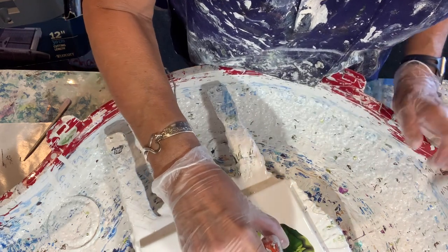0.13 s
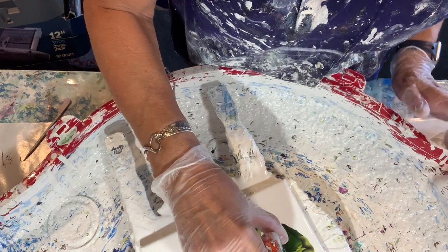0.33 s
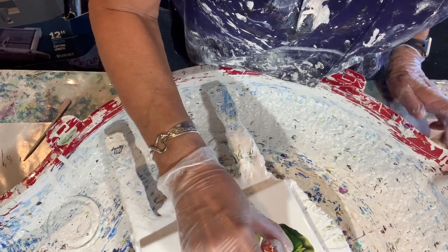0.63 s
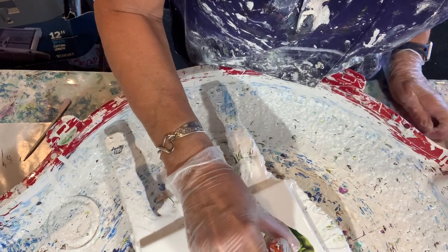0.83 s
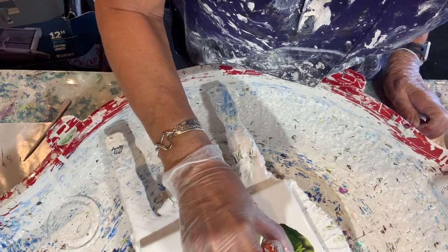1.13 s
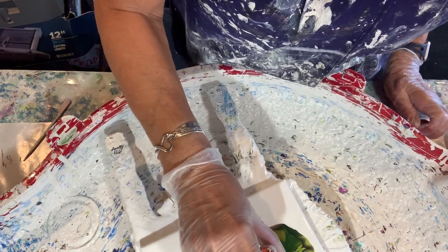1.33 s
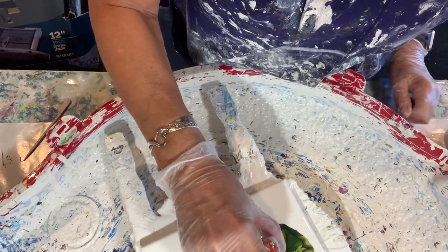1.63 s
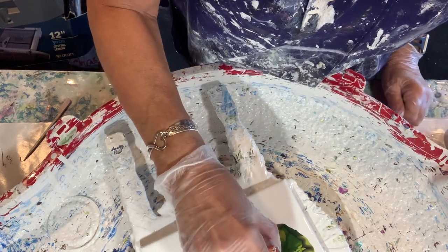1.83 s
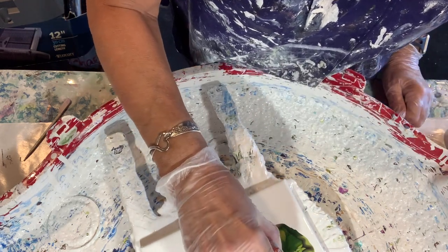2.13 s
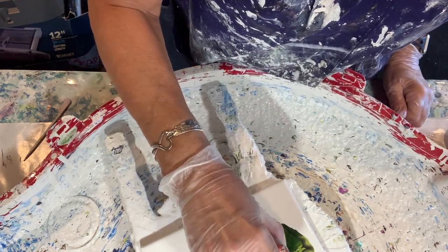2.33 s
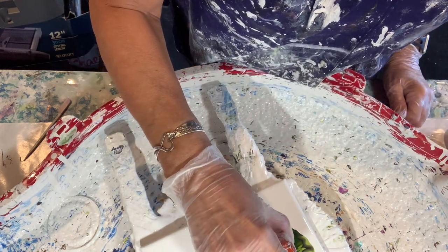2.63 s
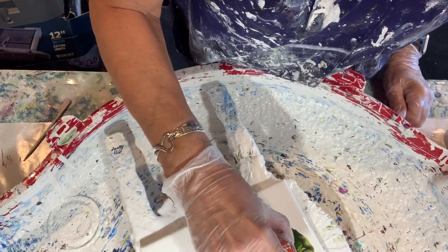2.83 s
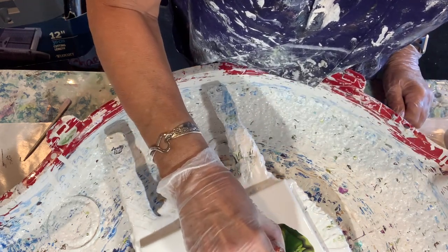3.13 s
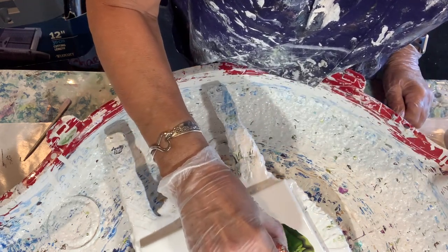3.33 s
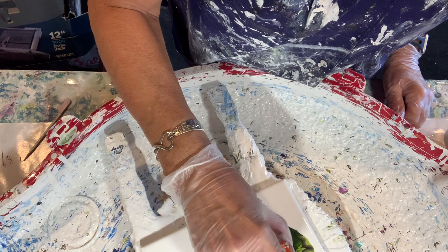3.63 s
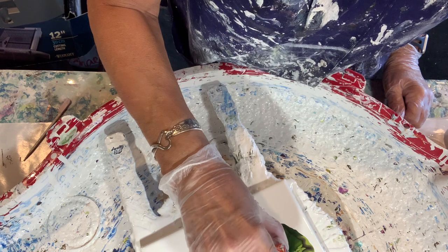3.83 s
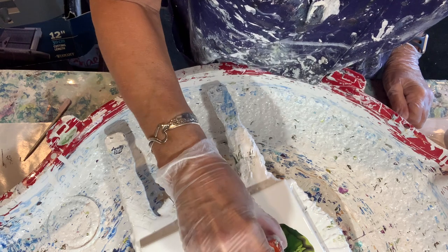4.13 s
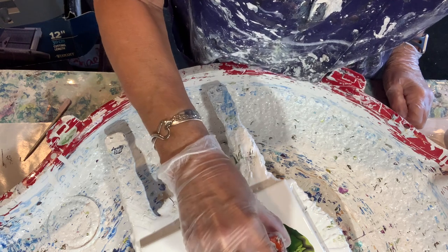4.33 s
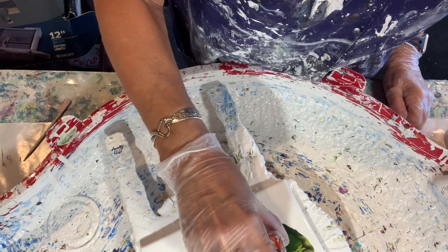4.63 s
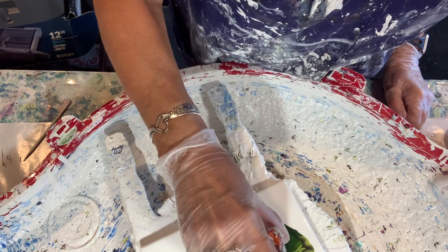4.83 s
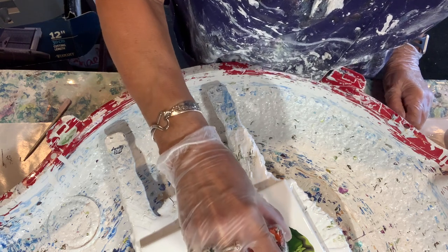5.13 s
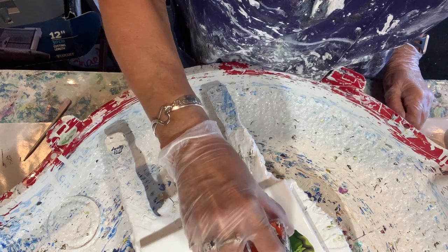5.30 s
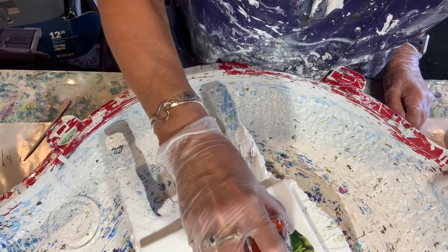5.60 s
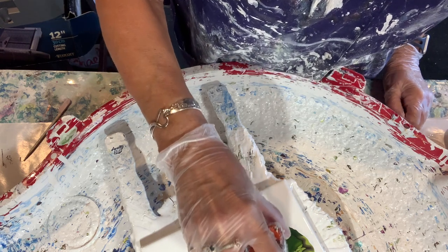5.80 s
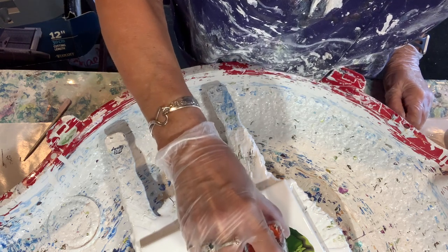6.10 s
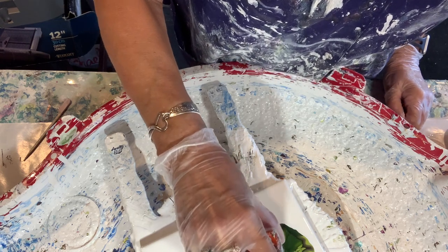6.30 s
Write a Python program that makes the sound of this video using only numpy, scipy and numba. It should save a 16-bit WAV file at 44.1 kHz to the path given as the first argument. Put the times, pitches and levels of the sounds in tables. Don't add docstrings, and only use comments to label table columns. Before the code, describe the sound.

A tiny handheld blower whirs steadily, with a wavering high whine and airy hiss over faint room rumble, and one small sharp metallic click early on.

```python
import sys
import numpy as np
from scipy import signal
from scipy.fft import rfft, irfft
from scipy.io import wavfile
from scipy.ndimage import uniform_filter1d
from numba import njit

SR = 44100
rng = np.random.default_rng(int(sys.argv[2]) if len(sys.argv) > 2 else 0)


def digitize_waveform(pressure):
    field = np.atleast_2d(pressure).T
    bounded = np.clip(field, -1, 1)
    quanta = np.round(bounded * 32767).astype(np.int16)
    wavfile.write(sys.argv[1], SR, quanta)


def rack_gain(trim_db):
    fader = np.asarray(trim_db, float)
    return 10 ** (fader / 20)


N = 284883
HZ = np.arange(N // 2 + 1) * SR / N + 1e-3
STEP = 64

# pitch_hz, level_db_per_hz
ROOM_RUMBLE = [(25, -102), (40, -90), (58, -69), (90, -73.5), (150, -76.5), (185, -99.5), (300, -100)]
# start_s, peak_db
CHARM_CLICKS = [
    (.7275, -37),
    (.772, -35),
    (.881, -36),
    (1.1081, -7.5),
    (1.1115, -17),
    (1.1172, -21),
]
# pitch_hz, level_db, t60_s
CHARM_MODES = [(440, -24, .03), (2180, -14, .04), (3150, -18, .03), (6600, -16, .012), (7400, -9, .012),
               (8900, -6, .008), (10900, -3, .01), (12400, -11, .012), (14000, -8, .008)]
# pitch_hz, level_db_per_hz
JET_HISS = [(170, -84), (300, -86), (600, -89), (800, -82), (1050, -77), (1350, -73), (1600, -81),
            (2000, -85), (2400, -92), (3300, -90), (5100, -92), (6400, -96), (8800, -92.5), (12700, -103),
            (15500, -100)]
# pitch_hz, width_hz, level_db, share of the nozzle swell
CAVITIES = [(1259, 94, -53.5, 0.22), (1383.3, 66, -48, 0.4), (1460, 48, -78, 0.63),
            (1938, 44, -59.5, -0.29), (2088, 210, -58.5, -0.7), (2830, 870, -57.5, 0.25),
            (4230, 200, -67, -1.3)]
# start_s, shaft_turns_per_s, yaw, pitch, roll (spreads about the mean pose)
HAND_MOTION = [(0.0, 152.25, 0.2, 2.3, -1.3), (0.16, 152.32, -0.0, 1.1, 0.0),
               (0.72, 150.43, -1.3, -0.2, -0.1), (1.28, 151.87, 0.2, 0.2, -1.2),
               (1.64, 150.34, -0.6, -0.7, -1.8), (1.76, 150.14, -0.8, 1.3, -2.0),
               (2.16, 150.81, -1.2, 0.5, 2.2), (2.44, 150.92, -1.0, 0.4, 1.5),
               (2.75, 152.98, 0.3, 3.6, -0.1), (2.99, 150.91, -1.1, -0.8, 1.1),
               (3.11, 150.81, -0.8, -1.3, -1.6), (3.67, 150.99, -1.4, -0.5, 2.0),
               (3.79, 150.3, -1.1, -1.1, -0.0), (4.19, 150.52, 0.3, -1.4, -1.1),
               (4.67, 152.15, 1.4, -0.1, -1.0), (5.02, 152.52, 1.8, 1.6, -0.2),
               (5.46, 151.32, 1.1, -1.4, 1.6), (6.46, 152.1, 1.2, 0.2, 0.1)]
# multiple, level_db
WEAK_MULTIPLES = [(1, -63), (5, -74), (12, -66), (14, -67), (15, -75), (16, -69), (17, -75), (20, -63),
                  (22, -67), (27, -65), (30, -67), (31, -66), (34, -64), (45, -63)]
# pitch_hz, level_db
HIGH_MULTIPLES = [(5500, -66), (6500, -67.5), (7300, -67), (7900, -71), (8600, -68), (10000, -70),
                  (11500, -69.5), (12500, -77), (13500, -74), (15500, -74)]
# multiple, level_db, db_per_yaw, db_per_pitch, db_per_roll
BEAMS = [(6, -55.5, -2.1, 2.0, -0.4), (7, -46, -2.3, 0.25, 0.1), (8, -52.0, 1.5, -2.5, 0.1),
         (9, -42, 1, -0.3, 0.5), (10, -46.5, -0.66, -2, 0.9), (11, -56, 5.5, 1.5, 0.9),
         (13, -60, -0.5, -2.0, -1.5), (18, -65.5, 5.5, -1.5, -2.3), (19, -65.5, -1.1, -1.5, 0),
         (21, -64, 3.5, 1.5, -0.5), (23, -67.5, -1.4, -1, -1.7), (24, -69.5, -3.3, 1.2, 2),
         (25, -64, -3.5, 0.9, -2.2), (26, -66.5, -1.5, 0.5, -1.5), (28, -65.5, -1.2, -0.8, 2.5),
         (29, -68, -1, 0.5, 3.5), (32, -67, 4, 0.1, 0.5), (33, -68, 0, -1.5, -3.7),
         (35, -66.5, 1.9, -3.5, -3.3), (36, -68.5, 2, 2.5, 2.8), (38, -76.5, 0, -2.5, 6),
         (39, -72, 5.5, -3.5, -2), (41, -73.5, -3.7, 1, 0.2)]
# start_s (centre), half_length_s, multiple, level_db
CANVAS_GLINTS = [(.72, 0.12, 6, -5), (1.758, 0.14, 6, 2), (1.76, 0.076, 8, -15), (2.0, 0.77, 18, 2),
                 (2.482, 0.083, 8, -3), (2.63, 0.086, 6, 7.5), (.75, 0.17, 25, 0.5), (2.1, 0.093, 7, 4.5),
                 (2.51, 0.043, 29, 9.5), (3.2, 0.22, 41, 5), (3.128, 0.16, 9, -2.5), (3.437, 0.19, 35, 5.5),
                 (3.55, 0.2, 29, 8), (3.926, 0.087, 10, 4), (4.24, 0.25, 38, 10)]
# pitch_hz, left_lead_rad
PORT_LEAD = [(60, 0), (200, .2), (900, -.5), (1700, -.8), (2100, -2.8), (2720, -1.9), (2880, -2.7),
             (3450, -2.0), (3900, .1), (4400, .6), (4900, 3.4), (6200, 5.4), (7400, 6.2), (15300, 18.9),
             (17000, 21.6)]
# pitch_hz, share heard alike (0 to 1)
PORT_LIKENESS = [(60, .99), (250, .7), (550, .6), (880, .96), (1500, .97), (2200, .7), (3000, .8),
                 (4000, .4), (5300, .15), (6200, .6), (7400, .93), (9000, .97), (15000, .97)]
# pitch_hz, left_minus_right_db
PORT_BALANCE = [(60, 3.3), (130, 3), (300, 0), (700, -1.8), (1050, -2.8), (1380, -3), (1500, -.5),
                (2300, -1.5), (3000, -.4), (15000, -.1)]


def in_time(rows):
    start_s, *columns = np.transpose(rows)
    return [np.interp(np.arange(N) / SR, start_s, column) for column in columns]


def at_hz(points, hz):
    points = np.array(points)
    return np.interp(np.log(hz), np.log(points[:, 0] + 1), points[:, 1])


def drift(rate_hz, count=1):
    r = np.exp(-2 * STEP * np.pi * rate_hz / SR)
    chance = rng.standard_normal((count, N // STEP + 1502))
    slow = signal.lfilter([1], [1, -2 * r, r * r], chance)[:, 1500:]
    return slow / slow.std(axis=1, keepdims=True)


def full(slow):
    return np.interp(np.arange(N) / STEP, np.arange(len(slow)), slow)


def coloured(spectrum):
    white = rfft(rng.standard_normal((2, N)))
    return irfft(white * rack_gain(at_hz(spectrum, HZ)) * np.sqrt(SR / 2), N)


def highpass(x, order, hz):
    return signal.sosfilt(signal.butter(order, hz, "high", fs=SR, output="sos"), x)


def resonate(x, hz, width_hz):
    r = np.exp(-np.pi * width_hz / SR)
    feed = np.array([1, 0, -1]) * (1 - r * r) / 2
    return signal.lfilter(feed, [1, -2 * r * np.cos(2 * np.pi * hz / SR), r * r], x)


def workroom():
    hum_hz = 71.35 + 0.783 * full(drift(2.8)[0])
    hum_db = -51 + 1.4 * full(drift(2.2)[0])
    hum = rack_gain(hum_db) * np.sqrt(2) * np.sin(2 * np.pi * np.cumsum(hum_hz) / SR)
    return coloured(ROOM_RUMBLE) + hum


def charm():
    push, tail = np.zeros((2, N)) + 1e-18, np.zeros((2, N))
    t = np.arange(SR // 4) / SR
    for start_s, peak_db in CHARM_CLICKS:
        at = round(start_s * SR)
        chance = rng.standard_normal((4, len(t)))
        push[:, at:at + len(t)] += rack_gain(peak_db) * chance[:2] * np.exp(-t / .001)
        bloom = np.exp(-t / .022) * np.minimum(t / .003, 1)
        tail[:, at:at + len(t)] += rack_gain(peak_db - 20) * chance[2:] * bloom
    out = highpass(tail + rack_gain(-16) * push, 2, 1500)
    for hz, level_db, t60_s in CHARM_MODES:
        r, w = rack_gain(-60 / (t60_s * SR)), 2 * np.pi * hz / SR
        ring = signal.lfilter([.5, 0, -.5], [1, -2 * r * np.cos(w), r * r], push)
        out += rack_gain(level_db - 19) * ring
    return out


def jet(turn, swell_db, hiss_db):
    air = coloured(JET_HISS)
    treble = highpass(air, 2, 2500)
    puff = 1 + .4 * np.sin(turn)
    gusts = rack_gain(hiss_db + 1.0 * full(drift(5.7)[0]))
    out = air + treble * (gusts * puff - 1)
    for hz, width_hz, level_db, share in CAVITIES:
        noise = rng.standard_normal((2, N))
        ring = resonate(resonate(noise, hz, width_hz), hz, width_hz)
        ring_db = level_db + share * swell_db + 2.1 * full(drift(2.8)[0])
        out += rack_gain(ring_db) * ring / ring.std()
    return out


@njit
def multiples(turn, strength):
    out = np.zeros((2, len(turn)))
    for n in range(len(turn)):
        step, part = n // STEP, n % STEP / STEP
        once = np.exp(1j * turn[n])
        spin = once
        for k in range(strength.shape[2]):
            for way in range(2):
                a = strength[way, step, k]
                glide = a + part * (strength[way, step + 1, k] - a)
                out[way, n] += (glide * spin).imag
            spin *= once
    return out


def rotor(turn, pose):
    top, fade_db, shake_db, slip_rad = 103, 3, 1.5, 0.72
    weak, beams = dict(WEAK_MULTIPLES), {round(k): row for k, *row in BEAMS}
    order = np.arange(1, top + 1)[:, None]

    fades = drift(2.2, count=2 * top).reshape(2, top, -1)
    fades *= np.minimum(order / 18, 1)
    shade = uniform_filter1d(drift(1.0, count=top), size=7, axis=0)
    fades += 1.5 * shade * (order > 30)
    slips = drift(1.8, count=2 * top).reshape(2, top, -1)

    level_db = fade_db * fades + shake_db * drift(15.6, count=top)
    level_db += 2.0 * (order > 16) * drift(8.0, count=top)
    level_db += 2 * ((order > 16) & (order < 46))
    scatter_db = rng.normal(0, 1.7, top)
    start_rad = rng.uniform(0, 2 * np.pi, (2, top, 1))
    steps = np.minimum(np.arange(fades.shape[2]) * STEP, N - 1)

    for k in range(1, top + 1):
        if k in beams:
            mean_db, *beam_db = beams[k]
            level_db[:, k - 1] += mean_db + 0.23 + np.dot(beam_db, pose[:, steps])
            level_db[:, k - 1] -= 0.58 * fade_db * fades[:, k - 1]
        elif k < 37 or k in weak:
            level_db[:, k - 1] += weak.get(k, -99) - 1.5
        else:
            level_db[:, k - 1] += at_hz(HIGH_MULTIPLES, 151.3 * k) + scatter_db[k - 1] - 4.5
    for centre_s, half_s, k, db in CANVAS_GLINTS:
        level_db[:, round(k) - 1] += db * np.exp(-.5 * ((steps / SR - centre_s) / half_s) ** 2)

    strength = np.sqrt(2) * rack_gain(level_db) * np.exp(1j * (slip_rad * slips + start_rad))
    return multiples(turn, np.ascontiguousarray(strength.transpose(0, 2, 1)))


def ports(ways):
    direct, scattered = rfft(ways)
    alike = np.clip(at_hz(PORT_LIKENESS, HZ), 0, 1)
    tilt = rack_gain(at_hz(PORT_BALANCE, HZ) / 2)
    lagged = direct * np.exp(-1j * np.interp(HZ, *np.transpose(PORT_LEAD)))
    right = alike * lagged + np.sqrt(1 - alike ** 2) * scattered
    return irfft(np.array([direct * tilt, right / tilt]), N)


def scene():
    shaft_per_s, yaw, pitch, roll = in_time(HAND_MOTION)
    turn = 2 * np.pi * np.cumsum(shaft_per_s) / SR
    tones = rotor(turn, np.array([yaw, pitch, roll]))
    air = jet(turn, swell_db=3 + 5 * yaw, hiss_db=-2 + 0.3 * roll)
    return ports(workroom() + charm() + air + tones)


def low_pass(x):
    return signal.sosfilt(signal.butter(12, 16730, fs=SR, output="sos"), x)


def record(dry):
    cut = highpass(dry, 4, 38)
    mix = irfft(rfft(cut) * (HZ < 15720), N)
    return low_pass(mix)


dry = scene()
out = record(dry)
digitize_waveform(out)
```